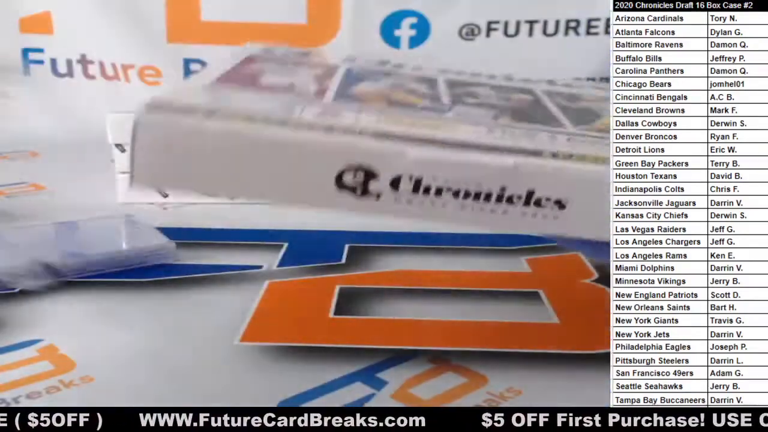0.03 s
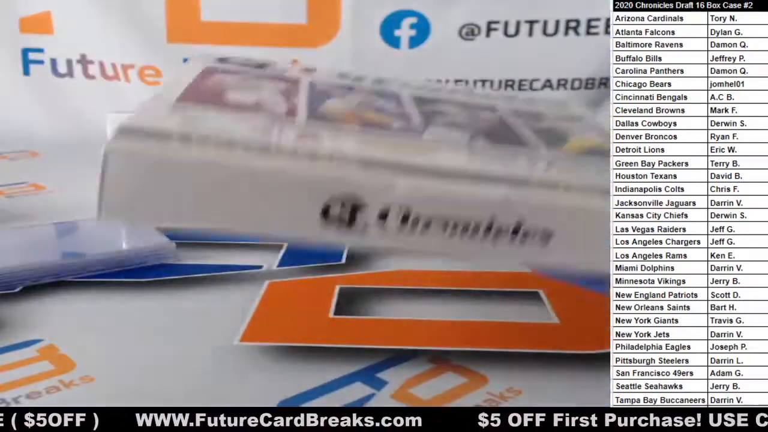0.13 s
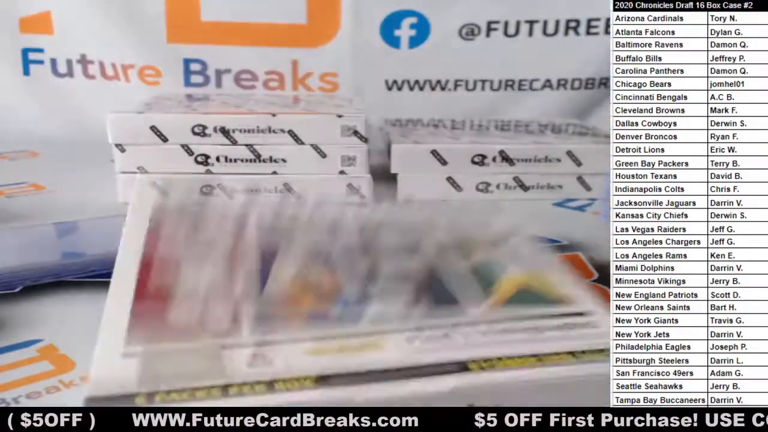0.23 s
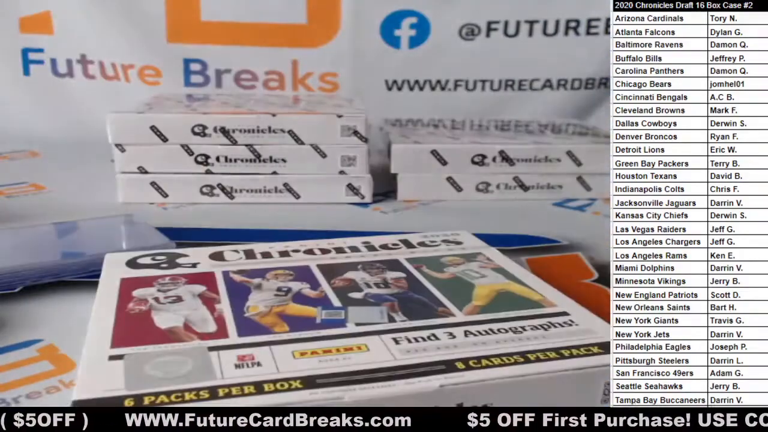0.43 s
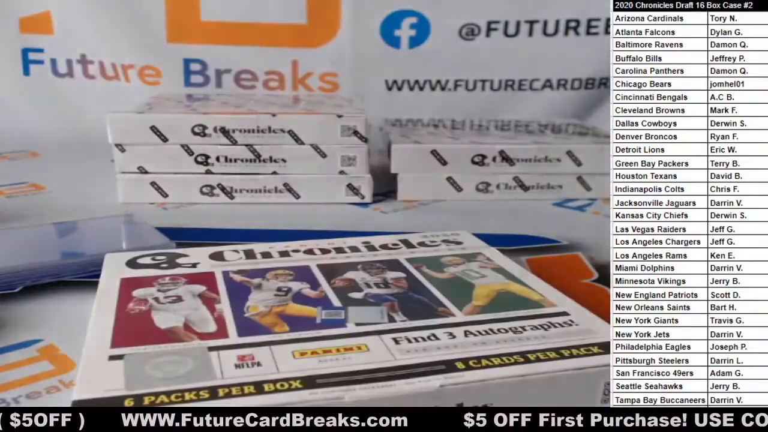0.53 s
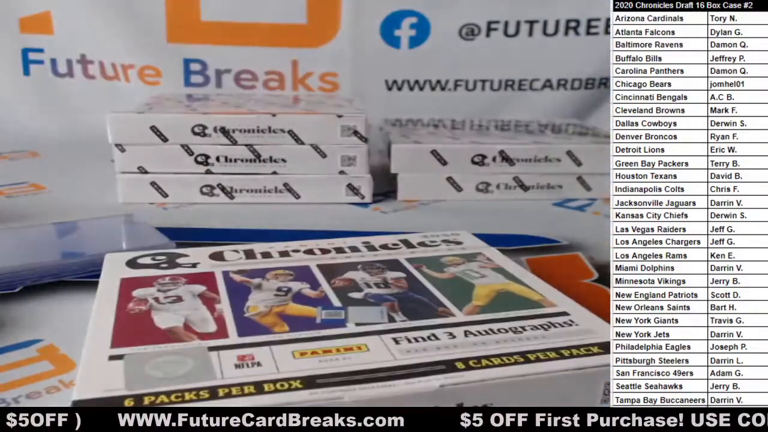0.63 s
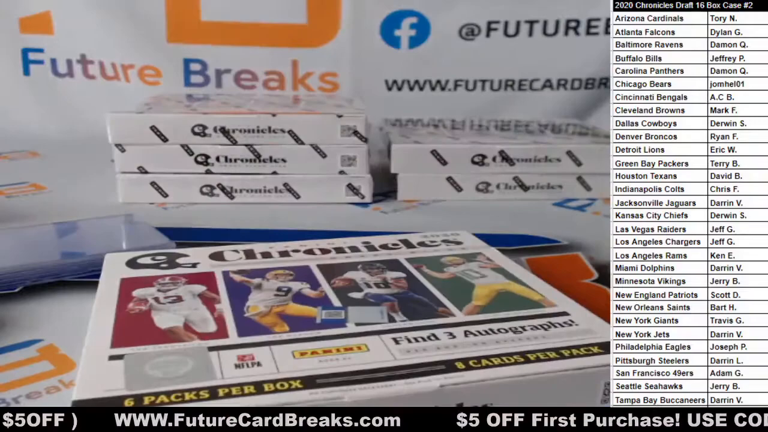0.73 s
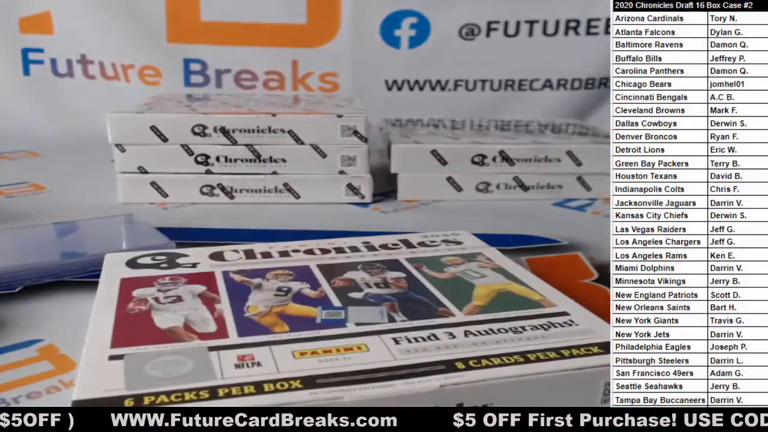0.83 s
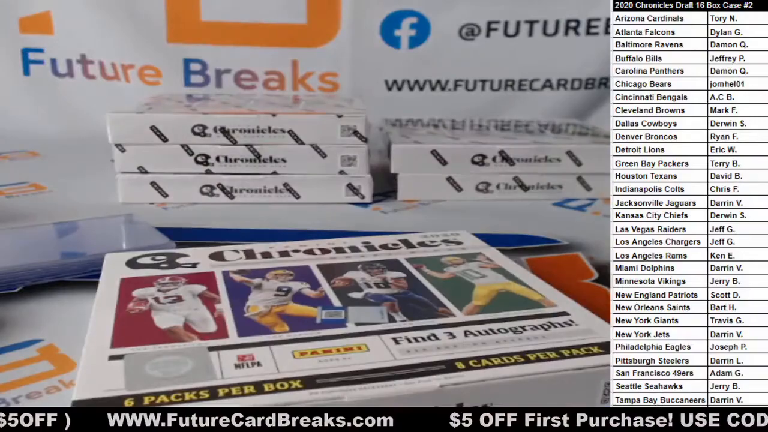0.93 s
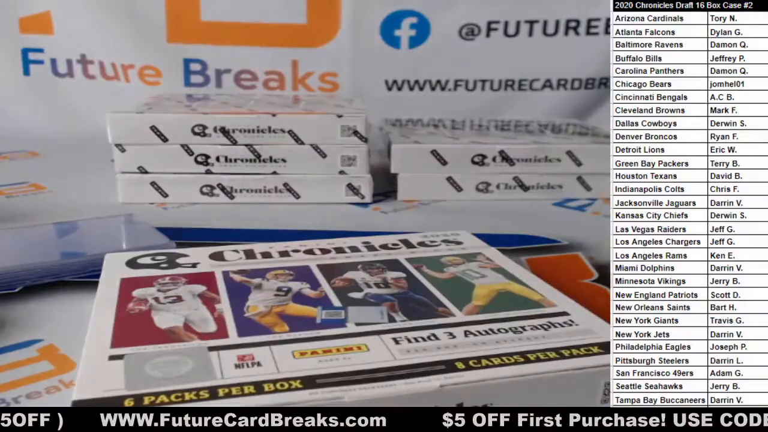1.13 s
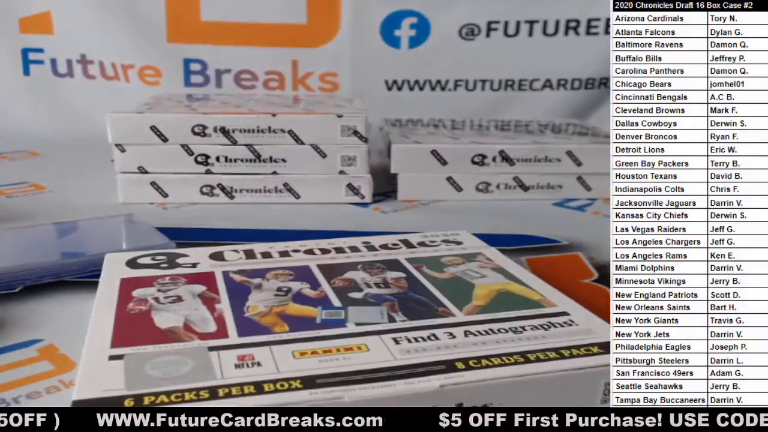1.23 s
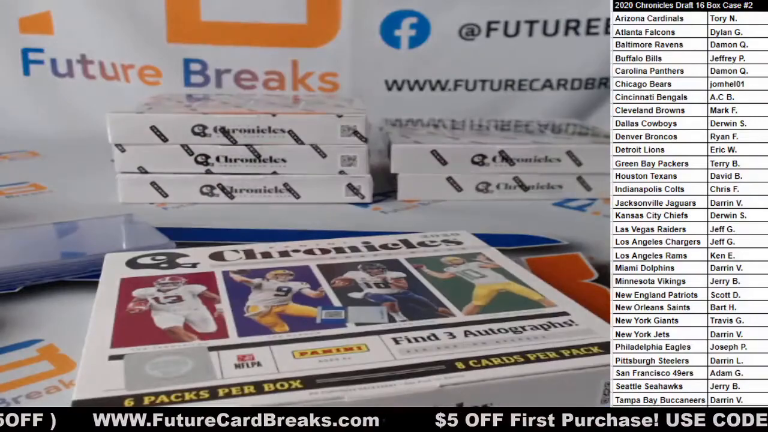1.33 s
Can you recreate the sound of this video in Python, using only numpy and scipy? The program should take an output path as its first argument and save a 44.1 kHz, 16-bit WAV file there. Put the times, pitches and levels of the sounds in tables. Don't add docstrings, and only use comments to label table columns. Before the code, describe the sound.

A shrink-wrapped cardboard box drops flat onto a light table with a loud, boomy thunk and crinkling

```python
import sys
import numpy as np
from scipy import signal
from scipy.fft import rfft, irfft, next_fast_len
from scipy.io import wavfile
from scipy.ndimage import uniform_filter1d, map_coordinates

SR = 44100
rng = np.random.default_rng(int(sys.argv[2]) if len(sys.argv) > 2 else 0)


def generate_wav(sig):
    pcm = np.round(np.clip(np.atleast_2d(sig).T, -1, 1) * 32767).astype(np.int16)
    wavfile.write(sys.argv[1], SR, pcm)


def linear_from_db(decibels):
    return 10 ** (np.asarray(decibels, float) / 20)


N = 61739

# t/s, peak level/dB, slap decay t60/s, panel level/dB, share of panel ring time
LANDINGS = [
    (0.2103, -9, .07, -1.5, .3),
    (0.2326, 4.5, 0.034, -13, 1),
]


def clock():
    return np.arange(N) / SR


def unit(x):
    return x / np.sqrt(np.mean(x ** 2) + 1e-20)


def level_curve(rows):
    return linear_from_db(np.interp(clock(), *np.transpose(rows)))


def along(points, hz):
    f, value = np.transpose(points)
    return np.interp(np.log(hz + 1), np.log(f + 1), value)


def noise(spectrum):
    length = next_fast_len(N + 8192)
    white = rfft(rng.standard_normal(length))
    colour = linear_from_db(along(spectrum, np.fft.rfftfreq(length, 1 / SR)))
    return unit(irfft(white * colour, length)[:N])


def wobble(rate):
    knots = rng.standard_normal(int(N * rate / SR) + 4)
    return map_coordinates(knots, [clock() * rate])


def patchy(x, depth_db):
    z = signal.stft(x, nperseg=256)[2]
    field = uniform_filter1d(rng.standard_normal(z.shape), size=7, axis=0)
    field = uniform_filter1d(field, size=9, axis=1)
    return signal.istft(z * linear_from_db(depth_db * unit(field)), nperseg=256)[1][:N]


def decay(start_s, t60, rise_s):
    t = np.maximum(clock() - start_s, 0)
    return linear_from_db(-60 * t / t60) * (1 - np.exp(-t / rise_s))


def ring(modes, start_s, rise_s):
    total = np.zeros(N)
    for k, (hz, db, t60) in enumerate(modes):
        tone = np.sin(2 * np.pi * hz * (clock() - start_s))
        total += (-1) ** k * linear_from_db(db) * decay(start_s, t60, rise_s) * tone
    return total


def grains(s, db, hz, cycles):
    turns = hz[:, None] * np.arange(96) / SR
    fade = linear_from_db(db[:, None] - 26 * turns / cycles) * np.minimum(turns, 1) ** 2
    clicks = fade * np.sin(2 * np.pi * turns)
    at = (s * SR).astype(int)[:, None] + np.arange(96)
    return np.bincount(at.ravel(), clicks.ravel(), N + 96)[:N]


def wrap():
    # t/s, level/dB
    handling_level = [(0, -44), (.05, -50.5), (.095, -55.5), (.135, -49.5), (.2, -59), (.3, -45),
                      (.44, -56.5), (.52, -54), (.62, -53.5), (.695, -48.5), (.735, -50.5), (.785, -52.5),
                      (.83, -54), (.91, -54), (.99, -72.5), (1.12, -84), (1.345, -84.5), (1.4, -57)]
    # f/Hz, level/dB
    film_colour = [(880, -37.5), (1500, -8.5), (2390, -3), (2800, -9), (3770, -2.5), (7610, -1.5),
                   (10000, -12), (15100, -10), (16000, -34.5)]
    # t/s, peak level/dB, f/Hz
    film_snaps = [(0.033, -42.5, 10590), (0.0414, -29, 11000), (0.075, -48.5, 5270), (0.1034, -40.5, 7000),
                  (0.1127, -35.5, 6800), (0.1333, -32, 9000), (0.154, -43, 10000), (0.354, -37.5, 10900),
                  (0.364, -21.5, 6670), (0.3831, -35, 9740), (0.446, -50, 10900), (0.463, -47, 9000),
                  (0.479, -47, 6630), (.494, -47, 8930), (.549, -39, 7110), (.571, -35.5, 9790),
                  (0.579, -47.5, 5570), (.720, -42, 8100), (.748, -45, 10230), (0.769, -41.5, 4550),
                  (.780, -43, 6360), (0.786, -39.5, 6000), (.893, -40.5, 11000), (0.896, -50, 10000)]

    u = rng.random((900, 3))
    crackle_db = -4.5 * np.log(u[:, 1] + 0.024)
    crackle_hz = 3000 * 12.0 ** u[:, 2]
    crackles = grains(u[:, 0] * N / SR, crackle_db, crackle_hz, cycles=3.5)
    clumps = linear_from_db(2.9 * wobble(38) + 0.67 * wobble(170))
    rustle = unit(clumps * patchy(noise(film_colour), depth_db=2.0) + 0.35 * unit(crackles))

    s, db, hz = np.transpose(film_snaps)
    snaps = np.zeros(N)
    for k, ratio in enumerate([0.72, 0.9, 1.15, 1.45]):
        snaps += grains(s + 0.00034 * k, db + 6, np.minimum(hz * ratio, 15500), cycles=3.5)
    return level_curve(handling_level) * rustle + snaps


def fingers():
    # t/s, level/dB
    rub_level = [(0, -47.5), (.085, -55.5), (.132, -47.5), (.2, -61), (.5, -53), (.62, -54.5), (.71, -57.5),
                 (.8, -61), (.9, -65), (1.1, -85.5), (1.34, -85.5), (1.4, -70)]
    # f/Hz, level/dB
    rub_colour = [(120, -39), (200, -13), (369, -9), (427, -3), (711, -9), (3000, -19.5), (3900, -39.5),
                  (6600, -120)]
    return level_curve(rub_level) * linear_from_db(1.6 * wobble(75)) * noise(rub_colour)


def table_murmur():
    # t/s, level/dB
    hands_level = [(0, -52.5), (.08, -49), (.17, -47), (.4, -33), (.6, -46.5), (.71, -36.5), (.9, -51.5),
                   (1, -50), (1.15, -46.5), (1.4, -45)]
    # f/Hz, level/dB
    rumble_colour = [(15, -23), (26, 3.5), (55, -8.5), (85, -3.5), (118, 2.5), (170, -16.5), (350, -29),
                     (1200, -92)]
    return level_curve(hands_level) * noise(rumble_colour)


def box():
    # f/Hz, level/dB
    slap_colour = [(90, -29.5), (170, -4), (500, 0.5), (1100, -1.5), (1800, -8), (4000, -21), (8000, -28),
                   (16000, -46)]
    # f/Hz, level/dB, t60/s
    panel_modes = [(261.4, -10.5, 0.34), (368, -0.5, 0.62), (419.7, 1.5, 0.72), (547.5, -1, 0.41),
                   (627, -11.5, 0.1), (642, -10, .3), (943, -5.5, 0.55), (990, -8, 0.26), (1200, -7, 0.18),
                   (1319, -4, 0.39), (1425, -2.5, 0.24), (1690, -10, 0.31)]
    slap_db, crack_db, box_db = -3.5, 2, -4.5
    crack_t60_s = 0.0085
    damping = 0.55
    flutter_db = 8

    slaps, close = np.zeros(N), np.zeros(N)
    for s, db, t60, panels_db, share in LANDINGS:
        panels = np.zeros(N)
        for hz, mode_db, mode_t60 in panel_modes:
            tone = ring([(hz, mode_db, mode_t60 * damping * share)], s, rise_s=0.001)
            panels += rng.choice([-1, 1]) * linear_from_db(flutter_db * wobble(60)) * tone
        slaps += linear_from_db(db + slap_db) * decay(s, t60, rise_s=0.0005) * noise(slap_colour)
        close += linear_from_db(db + crack_db) * decay(s, crack_t60_s, rise_s=0.0002) * noise(slap_colour)
        close += linear_from_db(db + box_db + panels_db) * panels
    return slaps, close


def room(x):
    # f/Hz, t60/s
    echo_t60 = [(200, .4), (600, 0.36), (1500, 0.46), (4000, 0.32), (12000, .26)]
    hz, t, z = signal.stft(rng.standard_normal(SR // 2 + SR // 4), SR, nperseg=256)
    fade = linear_from_db(-60 * t / along(echo_t60, hz)[:, None])
    tail = signal.istft(z * fade, SR, nperseg=256)[1]
    delayed = np.pad(x, (200, 0))
    return signal.fftconvolve(delayed, tail / np.linalg.norm(tail))[:N]


def table_boom():
    top_hz = [124.5, 105.7, 148.5]
    # level/dB, t60/s
    top_rings = [(-1, 0.28), (-2, 0.63), (-6, .79)]
    flat_s, rise_s, edge_db = 0.2328, 0.0054, -10
    settle_s, settle_takes_s, settle_db = 0.325, 0.005, -15.5

    top = [(hz, *rest) for hz, rest in zip(top_hz, top_rings)]
    smother = linear_from_db(edge_db - 60 * np.maximum(clock() - flat_s, 0) / 0.019)
    edge_boom = smother * ring(top, LANDINGS[0][0], rise_s)
    flat_boom = ring(top, flat_s, rise_s)
    settle = linear_from_db(settle_db * np.clip((clock() - settle_s) / settle_takes_s, 0, 1))
    return (edge_boom + flat_boom) * settle


def stand_sway():
    sway_hz = [21.7, 25.95, 41]
    # level/dB, t60/s
    sway_rings = [(-15, 1.3), (-8, 1.55), (-16.5, 1.2)]
    modes = [(hz, *rest) for hz, rest in zip(sway_hz, sway_rings)]
    return ring(modes, start_s=0.238, rise_s=0.01)


def bumps():
    # t/s, f/Hz, time held/s
    push_events = [
        (.957, 24, .06),
        (1.331, 117, .044),
        (1.3776, 102, .05),
    ]
    push_db = [-24, -24, -16]
    rise, stop = 0.7, 0.15

    total = np.zeros(N)
    for db, (s, hz, held) in zip(push_db, push_events):
        stopped = linear_from_db(-9 * np.maximum(clock() - s - held, 0) / (stop * held))
        total -= ring([(hz, db, 1)], s, rise * held) * stopped
    return total


def scene():
    slaps, close = box()
    landing = slaps + close + linear_from_db(-1.5) * room(slaps)
    table = table_boom() + stand_sway() + table_murmur() + bumps()
    return (landing + table + wrap() + fingers())[None]


def low_pass(x):
    return signal.sosfilt(signal.butter(12, 16620, fs=SR, output="sos"), x)


def record(dry):
    # t/s, gain/dB
    gate_gain = [(0, -1.5), (1.02, -1.5), (1.13, -10), (1.155, -21.5), (1.165, -81.5), (1.316, -80),
                 (1.328, -12), (1.34, 5.5), (1.4, 1.5)]
    clip_top, clip_hard = 0.96, 8
    x = dry * level_curve(gate_gain)
    x = x / (1 + np.abs(x / clip_top) ** clip_hard) ** (1 / clip_hard)
    return low_pass(x)


dry = scene()
out = record(dry)
generate_wav(out)
```